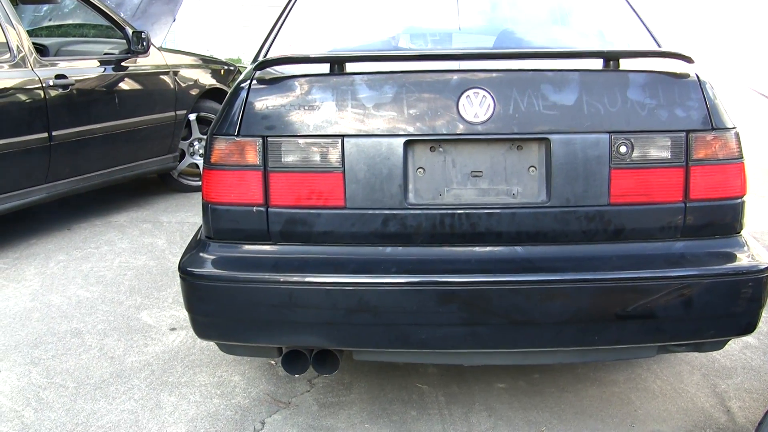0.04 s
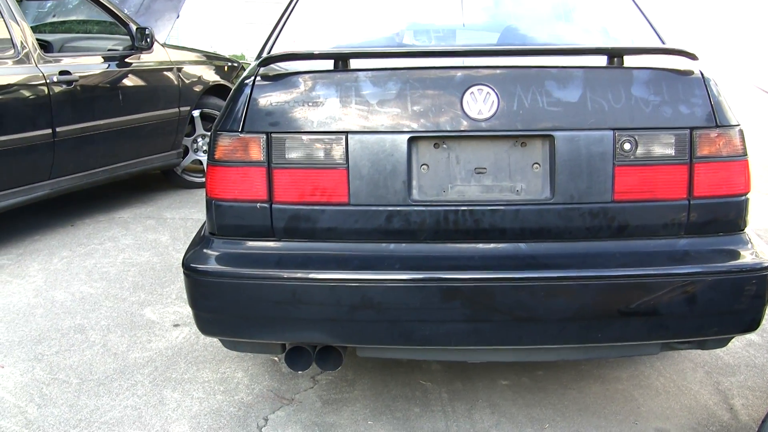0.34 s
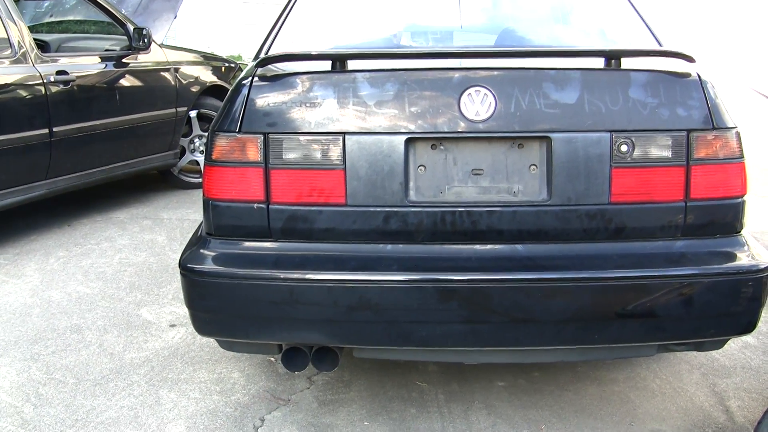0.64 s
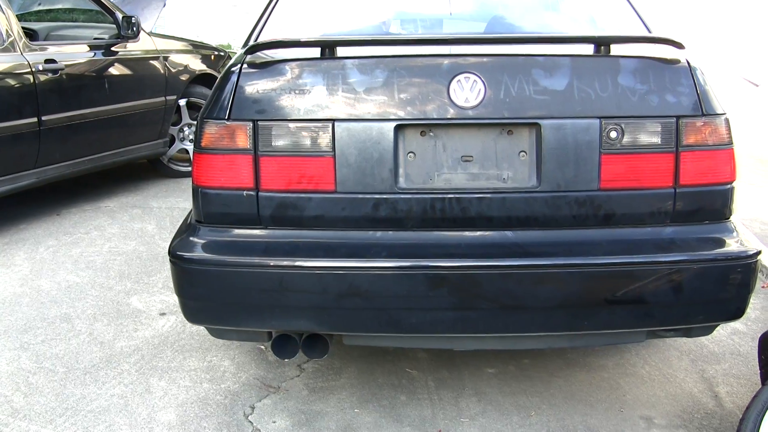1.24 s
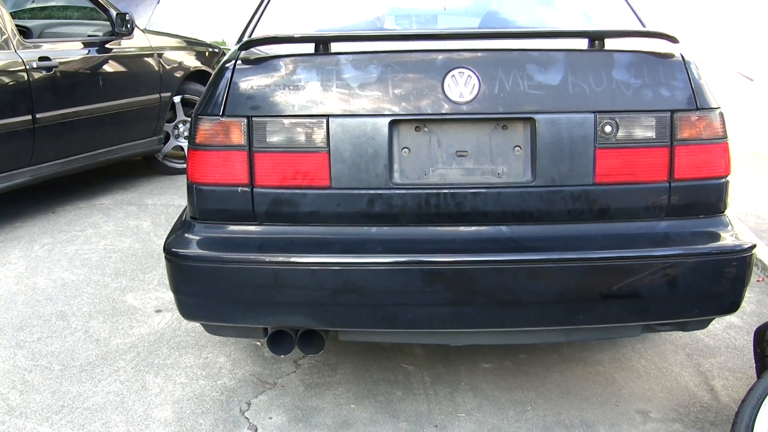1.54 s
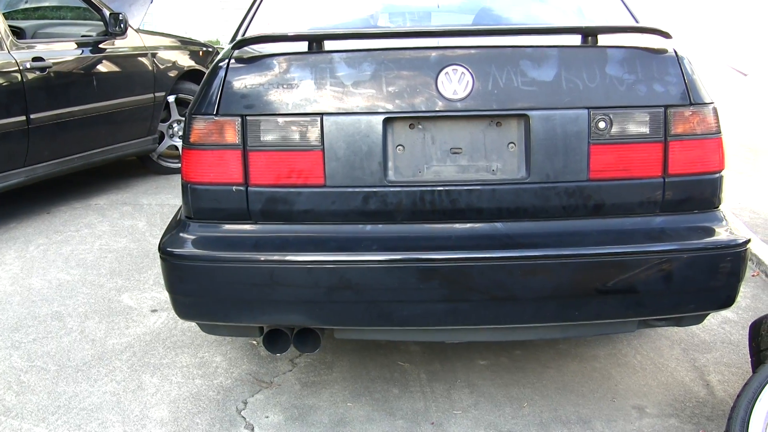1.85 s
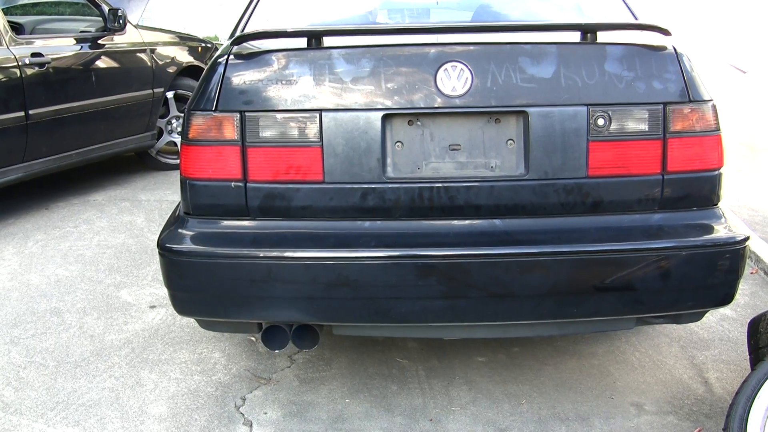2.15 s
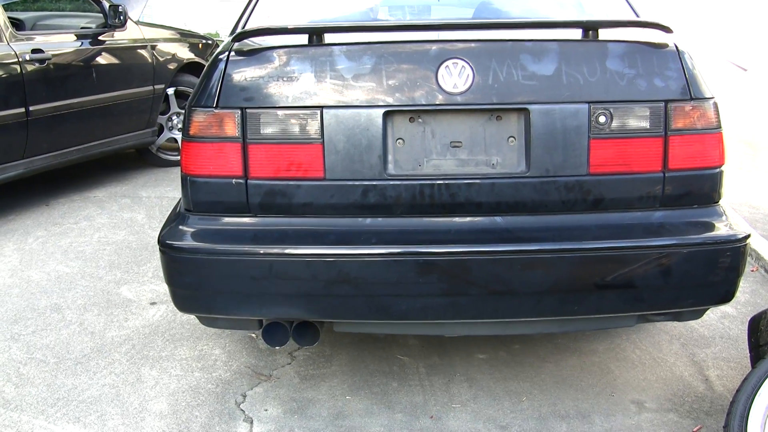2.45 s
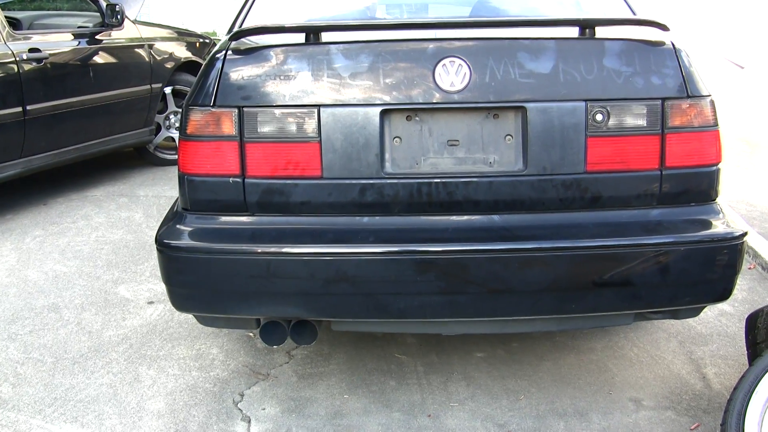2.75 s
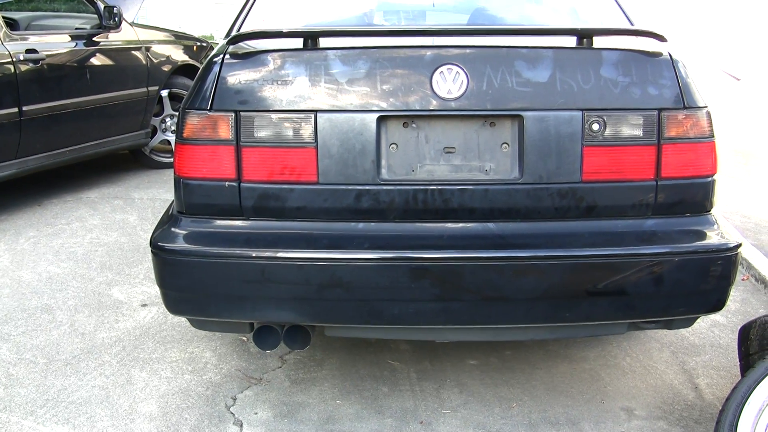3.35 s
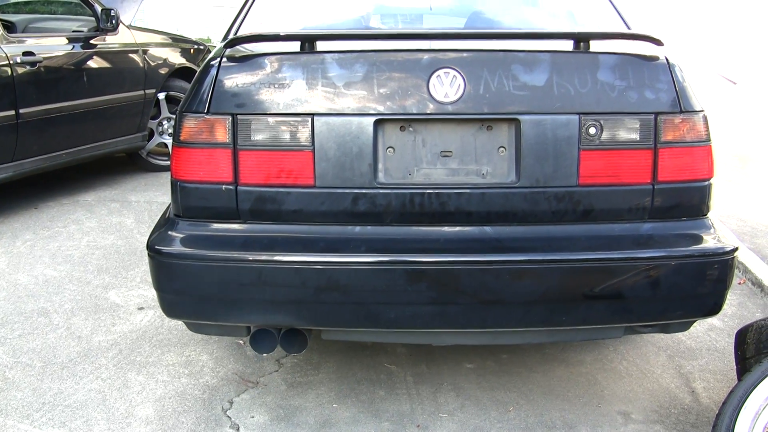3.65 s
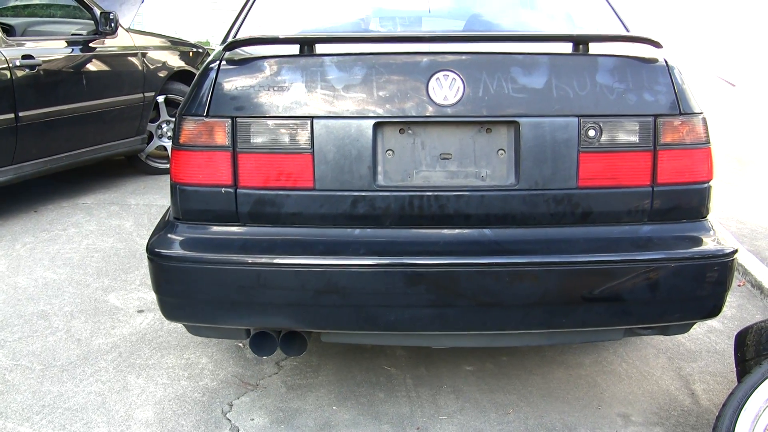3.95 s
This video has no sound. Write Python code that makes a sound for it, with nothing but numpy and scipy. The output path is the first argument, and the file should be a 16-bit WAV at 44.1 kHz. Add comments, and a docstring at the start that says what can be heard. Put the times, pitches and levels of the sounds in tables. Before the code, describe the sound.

A car engine winds down from high revs to a low, burbling idle.

```python
"""Six-cylinder engine settling to idle.

From behind the tailpipes, a car engine falls from its start-up flare to a lumpy idle. Firings ring the
exhaust: a smooth hum while it coasts, puffs and burbles when it fires again. Gas rushes out, a whistle
(likely a turbo) runs down, and a belt chirps over a light rattle. The yard reflects the exhaust,
a breeze flutters on the microphone, and a limiter catches the loudest booms."""
import sys
import numpy as np
from scipy import signal
from scipy.fft import rfft, irfft, next_fast_len
from scipy.io import wavfile
from scipy.ndimage import uniform_filter1d, minimum_filter1d, map_coordinates

SR = 44100
rng = np.random.default_rng(int(sys.argv[2]) if len(sys.argv) > 2 else 0)


def materialize(psi):
    """Save the field psi as 16-bit PCM at rate SR to the path in sys.argv[1].

    A 1-D psi becomes a single channel; in a 2-D psi each row is a channel.
    """
    bounded = np.clip(np.atleast_2d(psi).T, -1, 1)
    quanta = np.round(bounded * 32767).astype(np.int16)
    wavfile.write(sys.argv[1], SR, quanta)


N = 176400
T = np.arange(N) / SR
N_FFT = next_fast_len(N + SR // 2)
BIN_HZ = np.fft.rfftfreq(N_FFT, 1 / SR)
SIDE, STEREO_WIDTH = np.array([[1], [-1]]), 0.4


def amp(db):
    """Decibels to gain."""
    return 10 ** (np.asarray(db) / 20)


def unit(x):
    """Scale to rms 1."""
    return x / np.sqrt(np.mean(x ** 2) + 1e-20)


def gain_at(response, hz):
    """Gain of an (f/Hz, level/dB) response, on a log frequency axis."""
    f, db = np.transpose(response)
    return amp(np.interp(np.log(hz + 1), np.log(f + 1), db))


def curves(rows):
    """Per-sample curve of each column after the time."""
    times, *columns = np.transpose(rows)
    return [np.interp(T, times, column) for column in columns]


def wobble(rate_hz):
    """Smooth random curve, rate_hz knots a second."""
    position = np.cumsum(rate_hz * np.ones(N)) / SR
    return map_coordinates(rng.standard_normal(size=8000), [position], mode="wrap")


def colour(x, response):
    """Minimum-phase filter with an (f/Hz, level/dB) response."""
    cepstrum = irfft(np.log(gain_at(response, BIN_HZ)), N_FFT)
    cepstrum[1:N_FFT // 2] *= 2
    cepstrum[N_FFT // 2 + 1:] = 0
    return irfft(rfft(x, N_FFT) * np.exp(rfft(cepstrum)), N_FFT)[..., :N]


def noise(spectrum):
    """Coloured noise, rms 1."""
    return unit(colour(rng.standard_normal(N), spectrum))


def stereo_noise(spectrum):
    """Coloured noise, mostly central."""
    return noise(spectrum) + STEREO_WIDTH * SIDE * noise(spectrum)


def narrow_noise(hz, width_hz):
    """Noise band around a pitch, rms 1."""
    phase = 2 * np.pi * np.cumsum(hz * np.ones(N)) / SR
    return unit(wobble(width_hz) * np.sin(phase) + wobble(width_hz) * np.cos(phase))


def swell(centre_s, length_s):
    """Bell-shaped envelope."""
    return np.exp(-2 * ((T - centre_s) / length_s) ** 2)


def yard(x, t60_s=0.19, level_db=-22):
    """Short reflections off concrete and a neighbouring car spread the sound."""
    t = T[:SR // 4]
    tail = rng.standard_normal(len(t)) * amp(-60 * t / t60_s)
    reflections = signal.fftconvolve(x.mean(axis=0), tail / np.linalg.norm(tail))[:N]
    return amp(level_db) * SIDE * reflections


# Gusts: t/s, level/dB
GUSTS = [(0, -35.5), (.9, -30), (1.15, -28.5), (1.45, -19), (1.82, -31), (1.9, -14), (2.02, -10),
         (2.12, -12.5), (2.25, -13), (2.38, -20), (2.62, -12), (2.73, -1), (2.85, -17.5), (3.2, -8),
         (3.62, -15), (3.73, -6), (3.85, -16), (4, -19)]
# Buffeting spectrum: f/Hz, level/dB
BUFFET_SPECTRUM = [(20, -53.5), (40, -27.5), (75, -1), (125, -2.5), (200, -1), (300, -15), (450, -22),
                   (700, -38.5), (1500, -63), (4000, -110)]

def breeze(flutter_db=3, centre_db=-15):
    """Air buffets the microphone, its two sides mostly in opposition."""
    gusts = amp(curves(GUSTS)[0]) * unit(amp(flutter_db * wobble(30)))
    return gusts * (SIDE * noise(BUFFET_SPECTRUM) + amp(centre_db) * noise(BUFFET_SPECTRUM))


# Rattle spectrum: f/Hz, level/dB
RATTLE_SPECTRUM = [(2800, -31.5), (3550, 6.5), (4100, -21), (5200, -1.5), (5900, -14.5), (6600, -6.5),
                   (9000, -19), (12500, -19), (15000, -24.5)]
# Fade-in: t/s, gain
RATTLE_FADE = [(2.7, 0), (3.3, 1)]

def rattle(level_db=-48, flicker_db=2.2):
    """A light, flickering rattle fades in at idle."""
    ticking = unit(stereo_noise(RATTLE_SPECTRUM) * amp(flicker_db * wobble(90)))
    return amp(level_db) * curves(RATTLE_FADE)[0] * ticking


# Belt chirps: t/s, relative peak/dB
BELT_CHIRPS = [(2.9085, -37.5), (3.114, -33.5), (3.1815, -35), (3.2573, -44), (3.3243, -36.5),
               (3.3948, -47), (3.465, -26), (3.61, -40), (3.6787, -36), (3.75, -34), (3.821, -52),
               (3.8699, -38)]

def belt(pitch_hz=3540, length_s=0.014, lag_s=0.0037, gain_db=-7):
    """The belt chirps about once a crank turn at idle."""
    squeak = unit(np.sin(2 * np.pi * pitch_hz * T) + narrow_noise(pitch_hz, width_hz=200))
    return squeak * sum(amp(db + gain_db) * swell(t + lag_s, length_s) for t, db in BELT_CHIRPS)


# Rotor run-down: t/s, f/Hz, level/dB
RUN_DOWN = [(0, 8050, -47.5), (.25, 6360, -50), (.48, 5150, -36), (.66, 4652, -45), (.78, 4285, -40),
            (.86, 3970, -45), (1.07, 3535, -35.5), (1.25, 3293, -49), (1.55, 2910, -50.5),
            (1.78, 2635, -36), (2.1, 2235, -48), (2.4, 1969, -45.5), (2.7, 1828, -49.5), (3.1, 1629, -44.5),
            (3.55, 1322, -46.5), (3.9, 1223, -40.5)]

def whistle(waver_db=2):
    """A breathy, wavering whistle sinks as its rotor slows."""
    hz, db = curves(RUN_DOWN)
    width_hz = 260 + .06 * hz
    envelope = amp(db + waver_db * wobble(12))
    return envelope * (narrow_noise(hz, width_hz) + STEREO_WIDTH * SIDE * narrow_noise(hz, width_hz))


# Gas flow: t/s, relative rush/dB, relative hiss/dB
GAS_FLOW = [(0.0, -27.5, -45), (0.13, -29, -44.5), (0.33, -26.5, -41), (0.44, -25, -42.5),
            (0.95, -31, -47.5), (1.05, -28.5, -44.5), (1.28, -37.5, -54.5), (1.43, -36, -50.5),
            (1.45, -27.5, -44), (1.49, -35.5, -57), (1.51, -35.5, -54.5), (1.76, -32, -49.5),
            (1.97, -37, -52.5), (2.87, -39, -54.5), (3.41, -38, -56.5), (3.97, -37, -58)]
# Rush spectrum: f/Hz, level/dB
RUSH_SPECTRUM = [(350, -10.5), (600, -2), (1000, -13), (1080, -7), (1410, -14), (1730, -9), (2940, -17.5),
                 (3640, -21), (5340, -28.5), (6000, -34), (7800, -58.5), (13200, -120)]
# Hiss spectrum: f/Hz, level/dB
HISS_SPECTRUM = [(2500, -24.5), (4500, -2.5), (6000, -5), (8000, -5.5), (11000, -9), (15500, -18)]

def gas(firings, pulse_depth=.3, flutter_db=.7, rush_gain_db=2, hiss_gain_db=1):
    """Gas rushes and hisses from the tailpipes, pulsing with each firing."""
    rush_db, hiss_db = curves(GAS_FLOW)
    pulsing = np.exp(pulse_depth * np.cos(2 * np.pi * firings))
    flow = unit(pulsing * amp(flutter_db * wobble(40)))
    rush = amp(rush_db + rush_gain_db) * stereo_noise(RUSH_SPECTRUM)
    hiss = amp(hiss_db + hiss_gain_db) * stereo_noise(HISS_SPECTRUM)
    return flow * (rush + hiss)


# Sharp spits: t/s, length/s, level/dB
SHARP_SPITS = [(0.481, 0.022, -22.5), (0.776, 0.024, -21.5), (1.453, 0.029, -20), (2.739, 0.0053, -17.5)]
# Spit spectrum: f/Hz, level/dB
SPIT_SPECTRUM = [(200, 0.5), (600, 4.5), (1100, -11.5), (2500, -16), (5000, -42.5), (15000, -50.5)]

def spits():
    """A few sharp spits: three from the tailpipes, then a brief click of wind on the microphone."""
    envelope = sum(amp(db) * swell(t, length_s) for t, length_s, db in SHARP_SPITS)
    return envelope * stereo_noise(SPIT_SPECTRUM)


# Late burns: t/s, length/s, boom/dB, thump/dB
LATE_BURNS = [(.48, 0.033, -30, -31), (.633, 0.023, -6.5, -14), (.802, 0.07, -14, -59),
              (.935, 0.015, -1, -11), (1.463, 0.034, -5.5, -20), (1.686, 0.016, -25, -11),
              (1.777, 0.021, -5.5, -12), (1.865, 0.081, -5, -16.5), (1.945, 0.037, -15.5, -23),
              (2.04, 0.12, -13, -32), (2.102, 0.026, -2, -18.5), (2.175, 0.036, -8, -19.5),
              (2.289, 0.11, -13, -25.5), (2.438, 0.023, -8.5, -21), (2.654, 0.051, -5.5, -22),
              (2.796, 0.047, -6, -41), (2.929, 0.11, -13.5, -32)]

def burbles(boom_hz=235.9, thump_hz=76.5):
    """Late-burning charges swell the silencer's boom over a low thump."""
    out = np.zeros(N)
    for t, length_s, boom_db, thump_db in LATE_BURNS:
        boom = amp(boom_db) * np.cos(2 * np.pi * boom_hz * (T - t))
        thump = amp(thump_db) * np.sin(2 * np.pi * thump_hz * (T - t))
        out += np.sqrt(2) * swell(t, length_s) * (boom + thump)
    return out


# Pipe response to the hum: f/Hz, level/dB
HUM_RESPONSE = [(25, -50), (42, -38.5), (85, -20.5), (125, -16.5), (170, -20.5), (200, -10.5), (232, -12.5),
                (260, -19), (280, -21), (308, -13), (350, -36.5), (410, -18.5), (470, -25.5), (530, -43),
                (580, -26), (700, -66), (1000, -70)]
# Firing harmonics 1-4: level/dB
HARMONICS_DB = [3, 6, -2.5, -4]
# Bank imbalance: t/s, level/dB
BANK_IMBALANCE = [(.15, -24), (.3, 2), (.45, -8.5), (.6, -41), (1, -50)]

def hum(firing_hz, firings, level_db):
    """Firing harmonics sweep through the pipe's resonances; unequal banks add half orders."""
    def tone(order):
        phase = 2 * np.pi * order * (firings + order / 7)
        return np.sqrt(2) * gain_at(HUM_RESPONSE, order * firing_hz) * np.sin(phase)

    harmonics = sum(amp(db) * tone(order) for order, db in enumerate(HARMONICS_DB, 1))
    half_orders = tone(.5) + tone(1.5)
    return amp(level_db) * harmonics + amp(curves(BANK_IMBALANCE)[0]) * half_orders


def silencer(x, chambers_s=(.0067, .0111), feedback=.42):
    """All-pass chambers smear each puff in time without changing its colour."""
    spectrum = rfft(x, N_FFT)
    for delay_s in chambers_s:
        delay = np.exp(-2j * np.pi * BIN_HZ * delay_s)
        spectrum *= (delay - feedback) / (1 - feedback * delay)
    return irfft(spectrum, N_FFT)[:N]


# Cylinders in firing order: strength, lateness at idle/ms
FIRING_ORDER = [(1.56, .0), (0.89, 0.71), (1.22, 1.52), (0.51, .4), (1.73, -0.73), (.85, -1.22)]
# Pipe response to a puff: f/Hz, level/dB
PUFF_RESPONSE = [(15, -72), (30, -34), (45, -8), (80, -8.5), (125, -1.5), (165, -5.5), (195, -8), (232, 7),
                 (270, -8), (305, -6), (345, -13), (390, -24), (450, -17.5), (520, -30.5), (565, -24.5),
                 (700, -54), (1200, -47), (3000, -93.5)]

def puffs(firing_hz, firings, level_db, misfiring, round_trip_s=0.004403, echo_gain=0.32):
    """One puff per firing, different for each cylinder, rings the pipe and echoes in it."""
    onsets = np.flatnonzero(np.diff(np.floor(firings)))
    strength, late_ms = np.array(FIRING_ORDER)[np.arange(len(onsets)) % len(FIRING_ORDER)].T
    size_scatter, time_scatter = rng.standard_normal((len(onsets), 2)).T
    size = 1 + misfiring[onsets] * (strength - strength.mean() + 0.25 * size_scatter)
    shift_ms = (late_ms + .14 * time_scatter) * firing_hz.min() / firing_hz[onsets]
    shifted = np.round(onsets + shift_ms * SR / 1000).astype(int)
    train = np.bincount(np.clip(shifted, 0, N - 1), size, N)
    train[onsets] -= 0.5  # half the even part is left to the hum
    ring = silencer(colour(train / np.sqrt(firing_hz), PUFF_RESPONSE))
    echo = echo_gain * np.interp(T - round_trip_s, T, ring)
    return amp(level_db) * unit(ring + echo)


# Cylinder effort: t/s, hum/dB, puffs/dB, misfiring/0-1
CYLINDER_EFFORT = [(0, -2.5, -5.5, 1), (.13, -9.5, -13, 0.4), (.22, -10, -9, 0.7), (.35, -13, -7.5, 1),
                   (.5, 3, 1, 1), (.75, -1, -6, 0.82), (.97, -9.5, -3.5, 0.78), (1.06, 3, -6.5, 0.53),
                   (1.25, 1.5, -15.5, 0), (1.36, -6, -14, 0.1), (1.48, -8.5, -9, 0.8),
                   (1.9, -11, -7.5, 0.97), (2.6, -18.5, -13.5, 0.92), (3, -2.5, -15, 0.44),
                   (3.3, -4.5, -14, 0.35), (4, -4.5, -14.5, 0.24)]

def exhaust(firing_hz, firings, duck_depth=.55):
    """Regular firing hums and puffs; each burble partly displaces it."""
    hum_db, puff_db, misfiring = curves(CYLINDER_EFFORT)
    regular = hum(firing_hz, firings, hum_db) + puffs(firing_hz, firings, puff_db, misfiring)
    burbling = np.minimum(1, sum(swell(t, length_s) for t, length_s, _, _ in LATE_BURNS))
    return (1 - duck_depth * burbling) * regular + burbles()


# Engine speed: t/s, firing rate/Hz
FIRING_RATE = [(0, 239.7), (.25, 204.4), (.5, 179.7), (.75, 157.1), (1, 137), (1.25, 114.9), (1.4, 99.93),
               (1.5, 93.67), (1.75, 77), (2, 65.91), (2.25, 56.24), (2.5, 50.37), (2.75, 47.06), (3, 44.92),
               (3.25, 42.53), (4, 42.03)]

def scene(balance_db=1):
    """Engine speed drives the exhaust and gas pulses; the rest sounds around them."""
    firing_hz, = curves(FIRING_RATE)
    firings = np.cumsum(firing_hz) / SR
    direct = (exhaust(firing_hz, firings) + spits()) * amp(balance_db * SIDE)
    return direct + yard(direct) + gas(firings) + whistle() + belt() + rattle() + breeze()


def record(dry):
    """Peak limiter, then a brick-wall low-pass."""
    ceiling, lookahead_s, cutoff_hz = 1, 0.0013, 15700
    span = int(lookahead_s * SR)
    peak = np.abs(dry).max(axis=0) + 1e-9
    held_gain = minimum_filter1d(np.minimum(1, ceiling / peak), 2 * span + 1)
    limited = dry * uniform_filter1d(uniform_filter1d(held_gain, span), span)
    return irfft(rfft(limited, N_FFT) * (BIN_HZ < cutoff_hz), N_FFT)[:, :N]


dry = scene()
out = record(dry)
materialize(out)
```